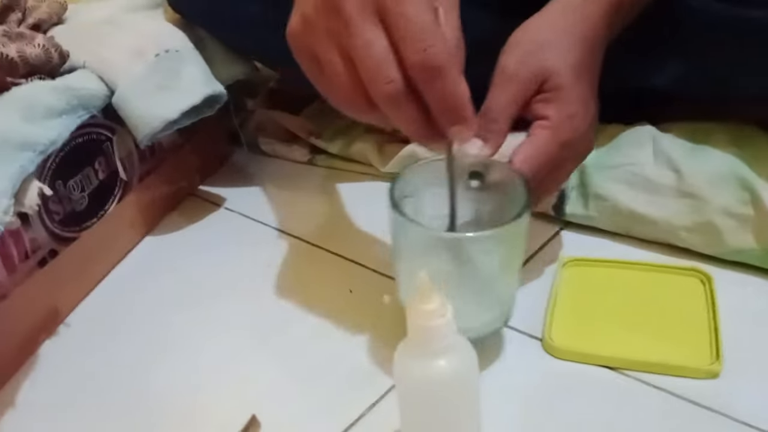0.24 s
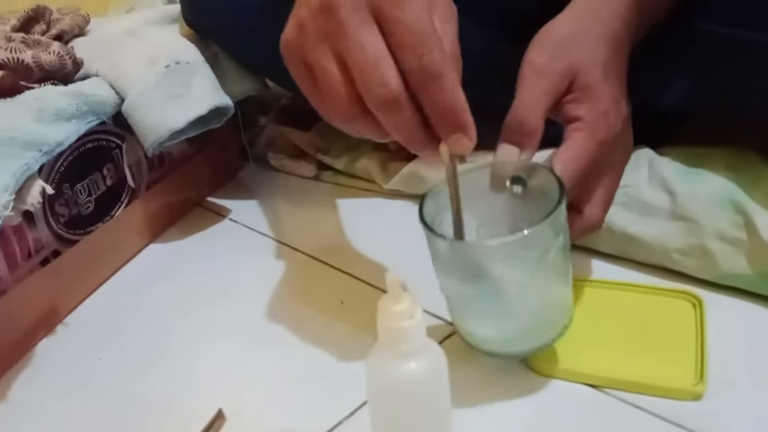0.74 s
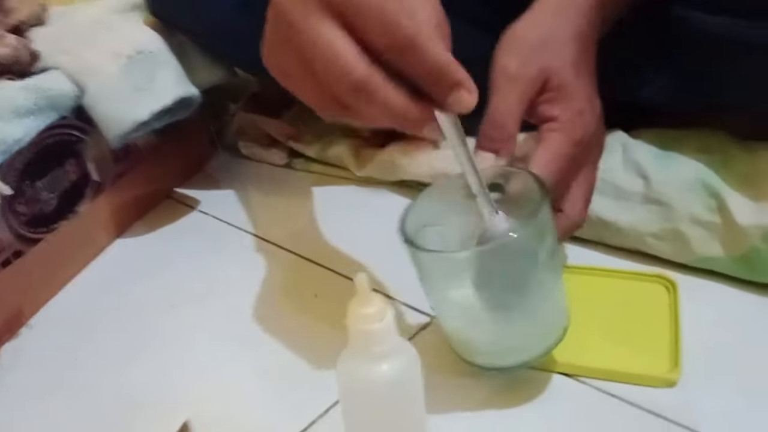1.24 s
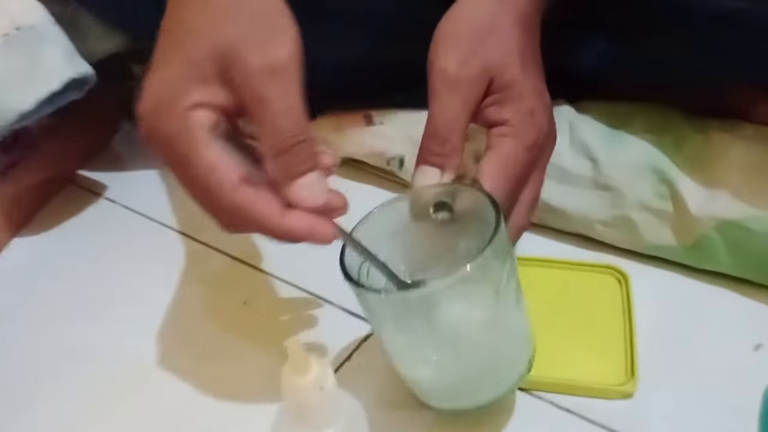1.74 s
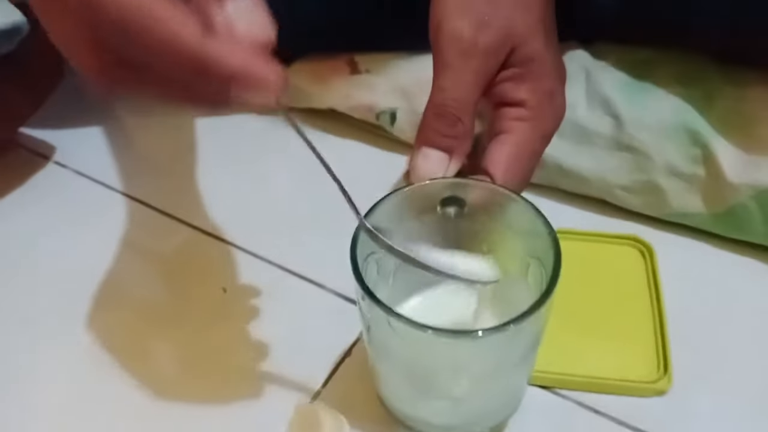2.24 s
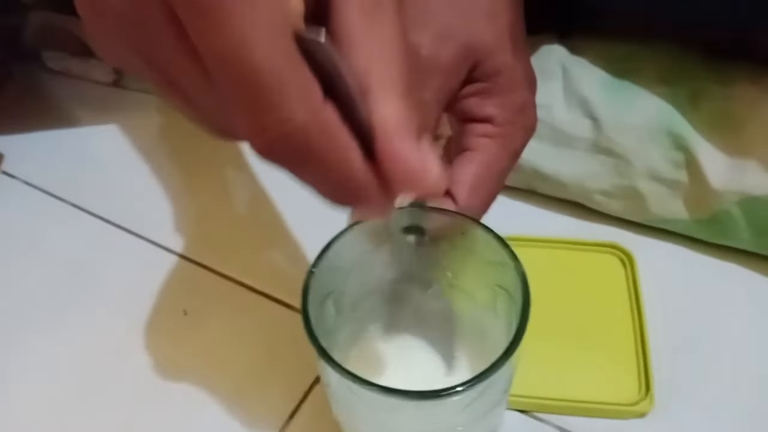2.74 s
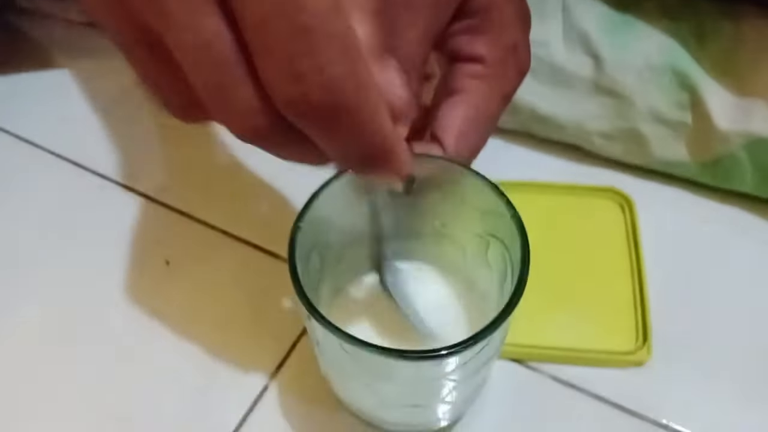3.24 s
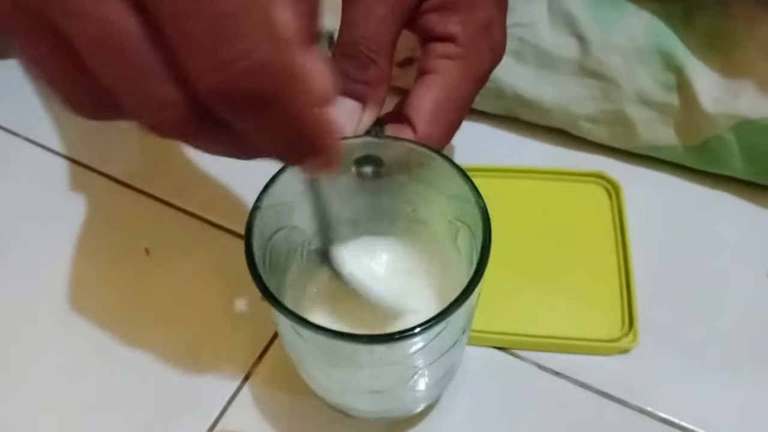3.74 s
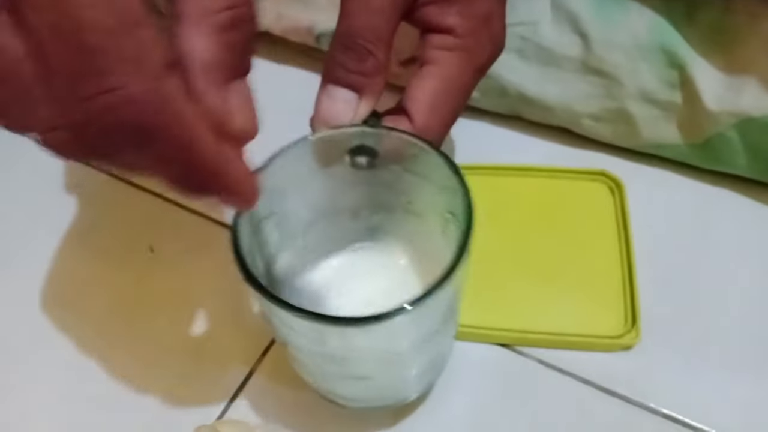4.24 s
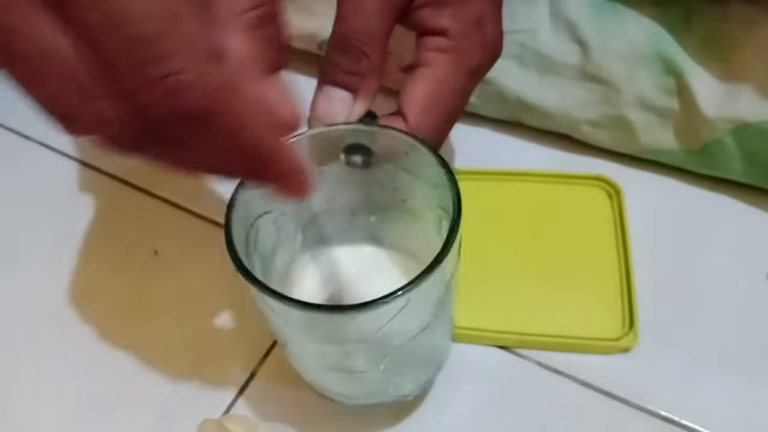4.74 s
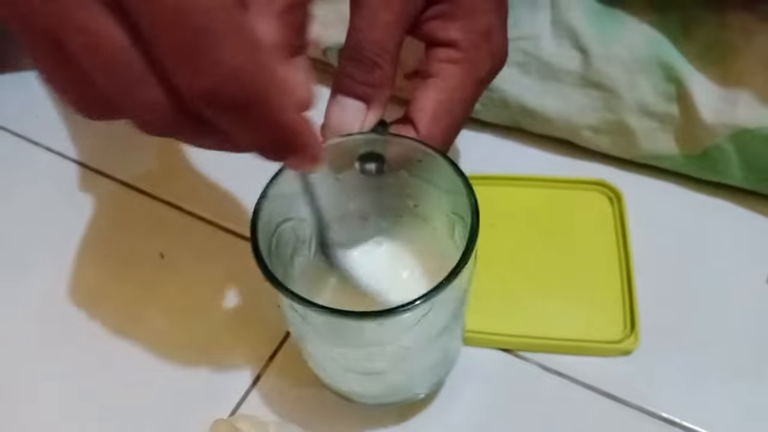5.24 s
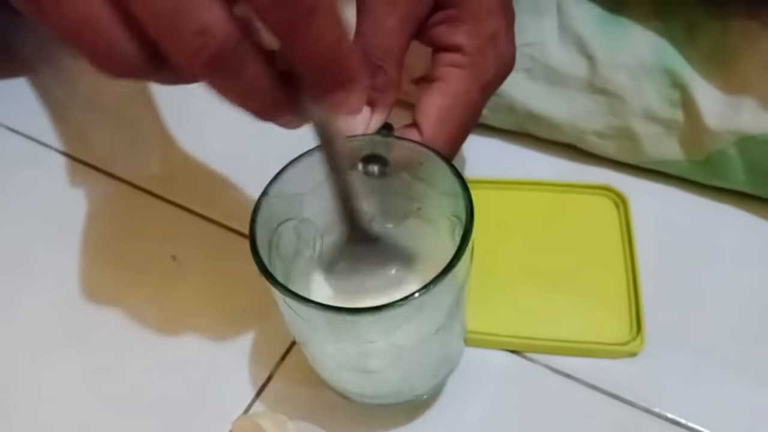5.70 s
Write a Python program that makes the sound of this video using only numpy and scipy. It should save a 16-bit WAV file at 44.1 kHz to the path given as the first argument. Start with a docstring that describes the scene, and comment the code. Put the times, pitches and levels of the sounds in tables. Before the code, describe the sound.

Close to a phone microphone in a small hard room, a metal spoon stirs milk in a thick glass tumbler on tile. A clink is already sounding at the start, with a brighter double tap around 0.13 seconds. From 0.45 to 1.3 it is mostly faint scraping, light ticks and a thin wavering drag of the glass base. Two moderate taps come near 1.5 and 1.65, with scraping and a brief low bump, then quiet ticks and small squeaks until 2.7. Clinks strengthen at 2.8 to 2.9. From 3.3 to 5.6 stirring is brisk: bright, irregular, quickly damped clinks, strongest near 3.3, 3.75 and 4.1 to 5.25, some with dull base knocks, over delicate rattling. A last clear tap lands at 5.56, then only tiny ticks near 5.9. Short slapping echoes follow the taps; soft air noise, low rumble and thin hiss stay underneath.

```python
"""Spoon stirring milk in a thick glass

A metal spoon stirs milk in a thick glass tumbler that a hand holds on a tiled floor, close to a phone.
Taps are noise cracks plus quickly damped ringing modes; the tilted base drags as wandering resonances.
Scrapes, thuds and a light rattle are filtered noise, noise bursts and tiny mode pings. A small hard room
answers with slapping echoes, over air noise, a low rumble and a thin hiss."""
import sys
import numpy as np
from scipy import signal
from scipy.fft import rfft, irfft
from scipy.io import wavfile
from scipy.ndimage import uniform_filter1d

SR = 44100
rng = np.random.default_rng(int(sys.argv[2]) if len(sys.argv) > 2 else 0)


def output_pcm(signal):
    """Save a mono or channel-first signal as 16-bit PCM at the path in sys.argv[1].

    Samples are clipped to [-1, 1] before scaling.
    """
    pcm = np.clip(np.atleast_2d(signal).T, -1, 1) * 32767
    wavfile.write(sys.argv[1], SR, np.round(pcm).astype(np.int16))


N = 263277
LEAD = SR // 2  # samples of run-up, so that a tap may begin before time zero

# Ringing modes of glass and spoon, one list a family: base, spoon, rim, wall, upper wall, fine.
# (frequency [Hz], relative level [dB], undamped decay by 60 dB [s])
MODE_FAMILIES = [
    [(774, -14.5, 0.18), (1006.6, -1, 0.054), (1072, 1, 0.15), (1185, -1, 0.13), (1237, -9.5, 0.79),
     (1335, -6, 0.1), (1476, -7.5, 0.12), (1623, 3.5, 0.047)],
    [(1729, -2.5, 0.059), (1800, -13, .08), (1810, 5.5, 0.63), (1935, 2, 0.03)],
    [(1959, 12, 0.23), (1934, 2, 0.1)],
    [(2003, -6.5, 0.2), (2187, 5.5, 0.053), (2386, 2, 0.053), (2571, -8, 0.15), (2622, -5, 0.095),
     (2734, -5, 0.6), (2799, -11, 0.47), (2943, 0, 0.047), (2947, -1.5, 0.026)],
    [(3160, -14.5, 0.069), (3200, -20.5, 0.027), (3412, 1.5, 0.016), (3503, -4, 0.059), (3661, -3.5, 0.017),
     (4000, -10, 0.021)],
    [(5526, -10, 0.041), (9796, 1, 0.026), (10780, -3.5, 0.028), (10390, 4, 0.012)],
]


def undb(db):
    """Turn decibels into an amplitude factor."""
    return 10 ** (np.asarray(db) / 20)


def unit(x):
    """Scale to an RMS of 1."""
    return x / np.sqrt(np.mean(x ** 2))


def decay(t, t60):
    """Exponential fall by 60 dB in t60 seconds."""
    return np.exp(-np.log(1000) * t / t60)


def band_pass(x, low_hz, high_hz):
    """Keep the sound between two frequencies."""
    return signal.sosfilt(signal.butter(2, [low_hz, high_hz], "band", fs=SR, output="sos"), x)


def on_log(hz, table):
    """Read (frequency [Hz], value) points on a log-frequency axis."""
    table = np.array(table)
    return np.interp(np.log(np.maximum(hz, 1)), np.log(table[:, 0]), table[:, 1])


def coloured(table, shape):
    """Unit-RMS noise with the given spectrum along its last axis."""
    hz = np.fft.rfftfreq(shape[-1], 1 / SR)
    spectrum = rfft(rng.standard_normal(shape)) * undb(on_log(hz, table))
    return unit(irfft(spectrum, shape[-1]))


def curves(table):
    """Draw each column of a timed table as straight lines over the scene."""
    s, *columns = np.transpose(table)
    return [np.interp(np.arange(N) / SR, s, column) for column in columns]


def walk(rate):
    """Random levels held 1 / rate s and smoothed twice; spread near 1."""
    hold = int(SR / rate)
    steps = np.repeat(rng.standard_normal(N // hold + 1), hold)
    return 1.3 * uniform_filter1d(uniform_filter1d(steps, hold), hold)[:N]


def wavering(hz, db, width_hz=80.0, clean=0.):
    """A narrow resonance kept going by uneven rubbing: its strength and phase wander within the width."""
    pole = np.exp(-np.pi * width_hz / SR)
    noise = rng.standard_normal(N) + 1j * rng.standard_normal(N)
    rub = signal.lfilter([1], [1, -2 * pole, pole ** 2], noise)
    rub = clean + rub / np.sqrt(np.mean(np.abs(rub) ** 2))  # clean is a steady part under the wander
    carrier = np.exp(2j * np.pi * np.cumsum(hz) / SR)
    return undb(db) * np.sqrt(2) * np.real(rub * carrier)


def background():
    """Noise beds: wandering room air, a swelling low rumble with a lower hum, and the hiss of stirred milk."""
    # Spectrum of the room air: (frequency [Hz], relative level [dB per Hz])
    air_colour = [(24, -45), (40, -12), (48, -12), (156, -7.5), (354, -12), (419, -7), (561, -17.5),
                  (1890, -15.5), (2190, -26.5), (3410, -24), (4200, -35.5), (6000, -35.5), (7800, -47.5),
                  (13200, -120)]
    # Low rumble: (time [s], level [dB])
    rumble_level = [(0.0, -69), (0.86, -74.5), (1.55, -71.5), (1.69, -58), (1.85, -71), (3.44, -70),
                    (5.97, -68.5)]
    # Milk and powder moving: (time [s], level [dB])
    swish_level = [(0.0, -64.5), (0.33, -72), (1.39, -71), (1.8, -62), (1.94, -69), (2.69, -72),
                   (5.5, -70.5), (5.65, -71.5), (5.97, -78)]
    # Spectrum of that hiss: (frequency [Hz], relative level [dB per Hz])
    hiss_colour = [(2940, -46.5), (5000, -51), (6350, -25), (6520, -11.5), (7420, 5), (8970, -8.5),
                   (10100, 4), (11400, -8), (12400, -7), (15200, -16.5), (16500, -50)]
    air = undb(-68 + walk(4)) * coloured(air_colour, (N,))
    rumble = unit(band_pass(rng.standard_normal(N), 123, 184))
    rumble *= undb(curves(rumble_level)[0] + 3.2 * walk(5.5))
    hum = undb(-76.0) * unit(band_pass(rng.standard_normal(N), 94.5, 110))
    swish = undb(curves(swish_level)[0] + 1.1 * walk(43)) * coloured(hiss_colour, (N,))
    return air + rumble + hum + swish


def damped_ring(family, free_s, base_hz, wall_hz, t, scatter_db=3.5, detune=0.002, waver_db=2.0,
                favour_db=18.5, reach=0.068, damped_t60=0.0096, left_db=-21.0):
    """One mode family rings freely for free_s, then spoon and milk damp all but a small lingering share."""
    hz, mode_db, t60 = np.transpose(family)[:, :, None]
    strength, pitch, phase = rng.standard_normal((3, len(family), 1))
    # modes close to the two favoured pitches are strongest; reach is in log frequency
    near_base = np.exp(-(np.log(hz / base_hz) / reach) ** 2)
    near_wall = np.exp(-(np.log(hz / wall_hz) / reach) ** 2)
    size = undb(mode_db + scatter_db * strength + favour_db * (near_base + near_wall))
    ring = size * decay(t, t60) * np.sin(2 * np.pi * (hz * (1 + detune * pitch) * t + phase))
    # sloshing milk makes each mode swell and sink
    slosh = signal.resample(rng.standard_normal((len(family), 12)), len(t), axis=1)
    ring *= undb(waver_db * slosh * np.minimum(t / 0.03, 1))
    damping = undb(left_db) + decay(np.maximum(t - free_s, 0), damped_t60)
    return damping * ring.sum(axis=0) / np.sqrt(np.sum(size ** 2))


def gritty_skid(loudest_db, short, grit_db=-7.0, skid_ms_per_db=0.11, clean_db=-22.0):
    """After the first touch the spoon skids on over gritty powder, longer when the tap is light."""
    skid_ms = max(skid_ms_per_db * (clean_db - loudest_db), .2)
    skid = rng.standard_normal(len(short)) ** 3 * np.exp(-short * 1000 / skid_ms)
    skid *= undb(grit_db) * np.sqrt(skid_ms / np.sum(skid ** 2))
    skid[0] = 1  # the first touch itself
    return skid / np.sqrt(np.sum(skid ** 2))


def taps(crack_s=0.0007, rise_s=0.00048, splash_s=0.004, splash_db=-4.5):
    """Each tap is a contact crack, a splash and damped modes, shared by where and how the spoon lands."""
    # Spoon taps: (time [s], ring [dB], height up the glass [0-1], flatness of contact [0-1],
    #  lean on the base [0-1], grit caught under the spoon [dB], favoured base [Hz], favoured wall [Hz])
    tap_list = [(-0.03, -21.5, 0.4, 0.77, 0.1, 5.5, 1490, 2720),
                (0.1245, -20.5, 0.83, 0.35, 0.4, 3, 1524, 3130),
                (0.1406, -13, 0.45, 0.54, 0.95, -1, 1480, 2878), (0.236, -29, 0.2, 0.8, 1, 0.5, 1600, 2684),
                (0.542, -44.5, 0.4, 0, 0.84, 17.5, 1600, 3470),
                (0.558, -41.5, 0.27, 0.4, 1, -3, 1570, 3160),
                (0.9193, -36.5, 0.41, 0.54, 0.0, -9.5, 1280, 2766),
                (1.3, -58.5, 0.03, 0.13, 1, 9.5, 1142, 2830),
                (1.4919, -25.5, 0.29, 0.46, 1, -4.5, 1580, 2760),
                (1.6424, -23.5, 0.52, 0.51, 0.12, 8.5, 1280, 2524),
                (1.9042, -45.5, 0.38, 0.73, 0, 9, 1490, 2580), (2.332, -43.5, 0.6, 0.6, 1, 8, 1620, 1620),
                (2.4095, -43.5, 0.13, 0.92, 0.97, 4, 1610, 2950),
                (2.5333, -47, 1, 0.35, 0.3, 9.5, 1350, 2400), (2.5723, -40.5, 1, 0.7, 0.25, -2, 1117, 2250),
                (2.6302, -57, 0.98, 0.57, 0.0, 10, 1220, 2360),
                (2.79, -27.5, 1, 0.76, 0.89, -5.5, 1232, 2776),
                (2.8869, -18, 1.0, 0.8, 0.2, -4, 1540, 2790),
                (2.9287, -35, 0.17, 0.2, 0.99, -11, 1680, 2940),
                (3.045, -26, 0.68, 0.55, 0.14, -14.5, 1590, 2790),
                (3.245, -49.5, 0.46, 1, 0.35, 11, 1490, 2930),
                (3.3039, -11.5, 0.74, 0.69, 0.03, -4, 1420, 2835),
                (3.4993, -29, 0.16, 0.4, 0.17, 4.5, 1430, 2800),
                (3.667, -45, 0.47, 1.0, 0.4, 3.5, 1560, 2650),
                (3.7501, -7.5, 0.77, 0.73, 0.23, -3, 931, 2540),
                (3.8836, -34, 0.14, 0.13, 0.5, -5, 1360, 2660),
                (3.9135, -27.5, 0, 0.3, 0.54, -8, 1490, 2640), (4.0455, -30, 0.3, 0.5, 0, -8, 1574, 2470),
                (4.135, -14.0, 0.5, 0.72, 0.02, 4.5, 1010, 2568),
                (4.2978, -39.5, 0.27, 0.1, 0.0, 0.5, 1480, 2650),
                (4.346, -43, 0.09, 0.03, 0.1, 0, 1560, 2920),
                (4.4158, -12.5, 0.07, 0.81, 0.6, -0.5, 1524, 2894),
                (4.4987, -11.5, 0.5, 0.64, 0.22, -0.5, 984, 2590),
                (4.6791, -25.5, 0, 0.14, 0.6, 2, 1520, 2360),
                (4.783, -15, 0.32, 0.32, 0.38, -5, 1674, 2800),
                (4.8774, -11.5, 0.64, 0.5, 0.42, -3.5, 1510, 2835),
                (5.0107, -28.5, 0.35, 0, 0.03, -5.5, 1510, 2710),
                (5.1562, -20, 0.31, 0.93, 0.35, -4, 1280, 2960),
                (5.2518, -11.5, 0.74, 0.51, 0.46, -1.5, 1548, 2720),
                (5.398, -28.5, 0.17, 0.45, 0, 0, 1825, 2680),
                (5.4446, -31, 0.45, 0.26, 0.48, -3, 1160, 3240),
                (5.5611, -17.5, 0.49, 0.54, 0.55, -0.5, 1564, 2824),
                (5.9188, -53, 0.6, 0, 0.0, 13, 1055, 3186), (5.943, -37, 0.95, 0.0, 0.13, 0, 1120, 3010)]
    # Share of each mode family in the ring:
    # (relative level [dB], added at full height [dB], at full flatness [dB], at full lean [dB])
    family_shares = [(-26.5, 1.5, -2.5, 21), (2.34, -32.5, 5, -9), (-23.5, 25, 2, -10.5),
                     (-27.5, 2.5, 29.5, 4.2), (-1.5, 5.5, -18.5, 1.9), (-13.5, 8, -2.5, -2.5)]
    # Free ring of each family before spoon and milk damp it [s]
    free_ring_s = [0.022, 0.0051, 0.022, 0.0074, 0.0066, 0.0086]
    # Spectrum of the contact crack: (frequency [Hz], relative level [dB per Hz])
    crack_colour = [(120, -80.5), (200, -39.5), (1320, -1.5), (1830, -4.5), (2510, 5.5), (3700, 6.5),
                    (4790, -32.5), (5550, -22), (6320, -38), (8970, -37), (9840, -19), (15300, -20),
                    (16500, -40)]
    # Spectrum of milk and grit thrown by a tap: (frequency [Hz], relative level [dB per Hz])
    splash_colour = [(2650, -39), (4500, -12.5), (4830, -42.5), (5380, -9), (8930, -6.5), (10000, -6),
                     (11400, -11), (15000, -14.5), (16500, -30.5)]
    t, out = np.arange(SR // 5) / SR, np.zeros(N + SR)
    short = t[:4096]
    for s, level_db, height, flat, lean, caught_db, base_hz, wall_hz in tap_list:
        share = undb(np.array(family_shares) @ [1, height, flat, lean])
        ring_db = level_db + 20 * np.log10(share / np.sqrt(np.sum(share ** 2)))
        ring_db[-1] += caught_db  # grit lifts the fine family
        # harder and flatter taps crack more over their ring
        crack_db = level_db * (1 + 0.39) + 5.5 + 2.5 * flat
        crack = undb(crack_db) * coloured(crack_colour, short.shape) * np.exp(-short / crack_s)
        splash = undb(ring_db[-1] + splash_db) * coloured(splash_colour, short.shape)
        splash *= np.exp(-short / splash_s)
        tap = np.zeros(len(t))
        tap[:len(short)] = crack + splash
        for family, db, free_s in zip(MODE_FAMILIES, ring_db, free_ring_s):
            tap += undb(db) * damped_ring(family, free_s, base_hz, wall_hz, t)
        onset = 1 - np.exp(-t / rise_s)
        tap = signal.fftconvolve(tap * onset, gritty_skid(max(ring_db), short))
        i = int((s + .5) * SR)
        out[i:i + len(tap)] += tap
    # the taps lose their deep bass
    high_pass = signal.butter(2, 300, "high", fs=SR, output="sos")
    return signal.sosfilt(high_pass, out[:N + LEAD])


def room(dry, gap_s=0.01776, early_db=-2.0, slap_db=11.0, slap_s=0.0016, flutter=0.48, turn=0.75):
    """Facing walls slap back and forth over a noise tail that shifts as hand and glass move."""
    # Decay of the room by 60 dB: (frequency [Hz], decay time [s])
    room_decay = [(200, 0.12), (1000, 0.26), (3000, 0.23), (6000, 0.21), (12000, 0.27)]
    t, echo = np.arange(SR // 2) / SR, 0
    for hz in 180 * 2 ** np.arange(0, 6.5, .5):  # half-octave bands, two independent tails
        band = band_pass(rng.standard_normal((2, len(t))), hz / 2 ** .25, hz * 2 ** .25)
        echo = echo + band * decay(t, on_log(hz, room_decay))
    slaps_db = 0
    for k in range(4):  # each slap lifts the tail by fewer decibels
        slaps_db = slaps_db + slap_db * flutter ** k * np.exp(-((t - (k + 1) * gap_s) / slap_s) ** 2)
    echo = echo * undb(early_db * (t < gap_s) + slaps_db)
    # a slowly wandering angle crossfades the sound between the two tails
    angle = np.pad(turn * np.pi * walk(3), (LEAD, 0), "edge")
    out = 0
    for weight, tail in zip((np.cos(angle), np.sin(angle)), echo):
        tail = tail / np.sqrt(np.sum(tail ** 2))
        out = out + signal.fftconvolve(dry * weight, tail)[:len(dry)]
    return out


def treble_shade(glass):
    """Raise or lower the glass's treble above 11 kHz over time."""
    # Gain of that treble: (time [s], gain [dB])
    shade_gain = [(0, -5.5), (1.2, 0), (2.6, 7.5), (4, 2), (5.97, -14.5)]
    top = signal.sosfiltfilt(signal.butter(3, 11000, "high", fs=SR, output="sos"), glass)
    return glass + (undb(curves(shade_gain)[0]) - 1) * top


def scrapes(grain_db=2.5, grain_rate=120, crackle_db=6.5):
    """The spoon edge scrapes through powder on the wall: grainy noise bands that start at once and fade. The
    list also holds one sharp, very short click at 2.23 s."""
    # Scrapes, and one very short click at 2.23 s: (time [s], fade [s], centre [Hz], width [Hz], level [dB])
    scrape_list = [(0.464, 0.027, 3620, 301, -60), (.465, 0.037, 3080, 296, -69),
                   (0.674, 0.041, 3600, 596, -67), (.69, 0.031, 3350, 348, -58),
                   (.674, 0.057, 9600, 4400, -60.5), (1.299, 0.024, 11500, 2970, -49),
                   (1.669, 0.049, 2820, 980, -48), (2.222, 0.012, 1880, 497, -54.5),
                   (2.2308, 0.00067, 1460, 2300, -46.5), (1.779, .006, 2680, 1000, -54),
                   (2.534, 0.059, 11900, 4000, -57), (3.459, 0.013, 3540, 696, -55),
                   (5.4, 0.065, 1180, 232, -49)]
    t, out = np.arange(N) / SR, 0
    for s, fade_s, hz, width_hz, db in scrape_list:
        # higher scrapes crackle more
        grit = np.minimum(rng.exponential(size=N), 5)
        rub = rng.standard_normal(N) * undb(crackle_db * hz / 12000 * grit)
        rub = unit(band_pass(rub, hz - width_hz / 2, hz + width_hz / 2))
        fade = (t > s) * np.exp(-np.abs(t - s) / fade_s)
        out = out + undb(db + grain_db * walk(grain_rate)) * rub * fade
    return out


def drag(catch_s=0.012, release_s=0.0089):
    """Resonances of the glass base glide as it tilts and slides, catching unevenly."""
    # Resonances that sing while the base slides:
    # (time [s], length [s], first pitch [Hz], last pitch [Hz], first level [dB], last level [dB])
    slide_list = [(.56, 0.177, 1570, 1640, -56, -60.5), (.561, 0.2, 2418, 2400, -71, -61.5),
                  (0.653, 0.27, 1800, 1860, -60, -65), (0.679, 0.336, 1274, 1290, -65.5, -62.5),
                  (0.723, 0.174, 2500, 2515, -62, -63), (1.03, 0.065, 1540, 1530, -70, -68),
                  (1.51, .12, 2850, 2870, -55, -63), (1.736, .11, 1960, 1940, -55, -60),
                  (1.79, .07, 2900, 3050, -59, -61), (1.809, 0.11, 1250, 1334, -63, -68.5),
                  (1.857, 0.05, 2700, 2740, -62.5, -60), (1.905, 0.062, 1470, 1462, -55, -62),
                  (1.998, .045, 1480, 1490, -59, -64), (2.345, .1, 1607, 1600, -53, -60),
                  (4.3, 0.13, 3670, 3450, -74.5, -66)]
    t, out = np.arange(N) / SR, 0
    for s, length, hz0, hz1, db0, db1 in slide_list:
        gone = np.clip((t - s) / length, 0, 1)
        touch = (np.tanh((t - s) / catch_s) - np.tanh((t - s - length) / release_s)) / 2
        hz = (hz0 + (hz1 - hz0) * gone) * (1 + .006 * walk(22))
        db = db0 + (db1 - db0) * gone
        out = out + touch * undb(2.5 * walk(60)) * wavering(hz, db)
    return out


def thuds(decay_s=0.011, low_hz=280, high_hz=1200):
    """The thick base knocks the tile: short noise bursts with only the dull middle kept."""
    # Knocks: (time [s], level before the band filter [dB])
    knock_list = [(2.23, -43), (3.302, -28), (3.758, -22.5), (4.134, -37.5), (4.494, -31), (4.877, -29),
                  (5.249, -33)]
    t, out = np.arange(SR // 10) / SR, np.zeros(N + LEAD)
    for s, db in knock_list:
        i = int((s + .5) * SR)
        out[i:i + len(t)] += undb(db) * rng.standard_normal(len(t)) * np.exp(-t / decay_s)
    return band_pass(out, low_hz, high_hz)


def rattle(start_s=3.3, end_s=5.5, touches_per_s=60., level_db=-67, spread_db=8.0, ring_s=0.0083):
    """While the spoon circles fast its edge chatters along the wall, waking one mode or another."""
    t, when, out = np.arange(SR // 10) / SR, np.arange(N + LEAD) / SR - .5, 0
    stirring = (when > start_s) & (when < end_s)
    for hz, _, _ in sum(MODE_FAMILIES[1:5], []):  # spoon, rim, wall and upper wall
        touch = stirring * (rng.random(len(when)) < touches_per_s / SR)  # rate is for each mode
        touch = touch * undb(spread_db * rng.standard_normal(len(when)))
        ping = np.exp(-t / ring_s) * np.sin(2 * np.pi * hz * t)
        out = out + signal.fftconvolve(touch, ping)[:len(when)]
    return undb(level_db) * unit(out)


def brief_hum():
    """A faint, brief hum: one narrow resonance, part steady and part wandering."""
    # Hum: (time [s], pitch [Hz], level before the steady part is added [dB])
    hum_path = [(5.05, 505, -110), (5.09, 502, -65), (5.21, 505, -62), (5.27, 505, -110)]
    return wavering(*curves(hum_path), width_hz=7.1, clean=0.76)


def scene():
    """Send taps, thuds and rattle through the room, then lay the other sounds beside them."""
    glass = taps() + thuds() + rattle()
    glass = (glass + undb(-6.0) * room(glass))[LEAD:]
    sound = background() + treble_shade(glass) + scrapes() + drag() + brief_hum()
    return sound[None]


def record(dry):
    """The phone thins the deep bass and cuts the top above 16.3 kHz."""
    dry = signal.sosfilt(signal.butter(1, 70, "high", fs=SR, output="sos"), dry)
    return signal.sosfilt(signal.ellip(8, .2, 70, 16300, fs=SR, output="sos"), dry)


dry = scene()
out = record(dry)
output_pcm(out)
```